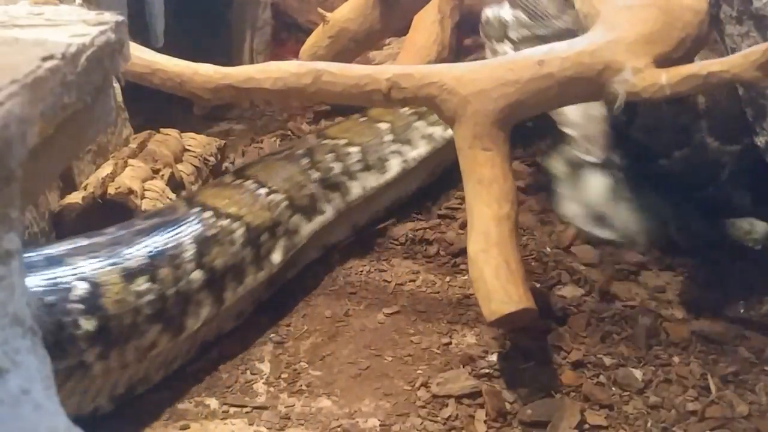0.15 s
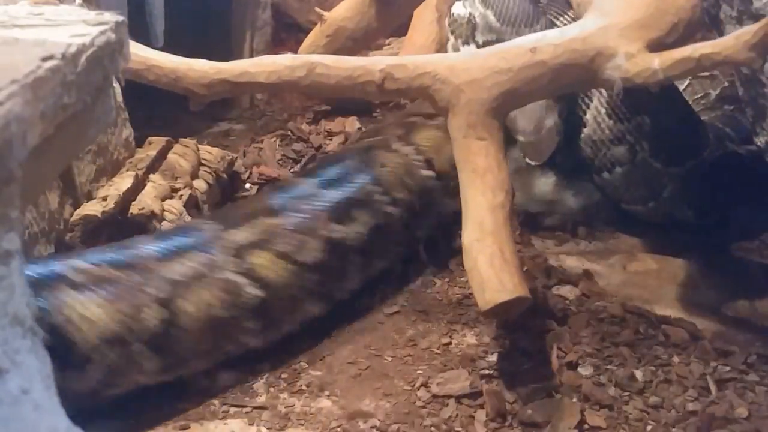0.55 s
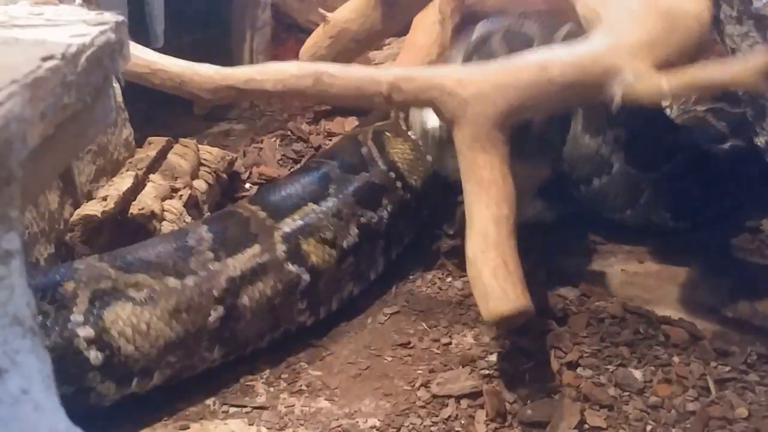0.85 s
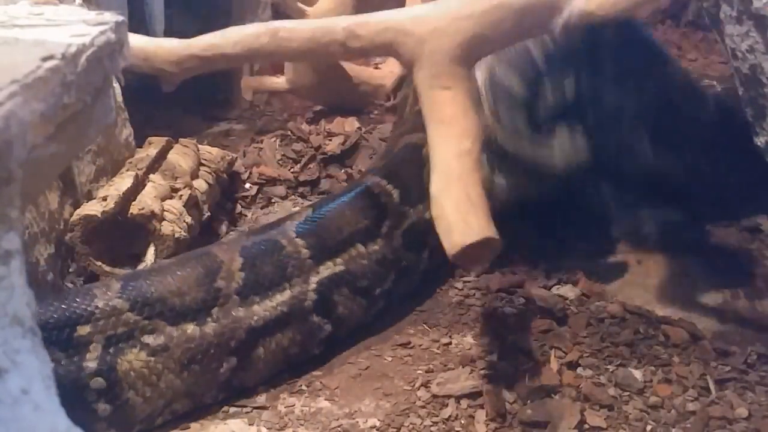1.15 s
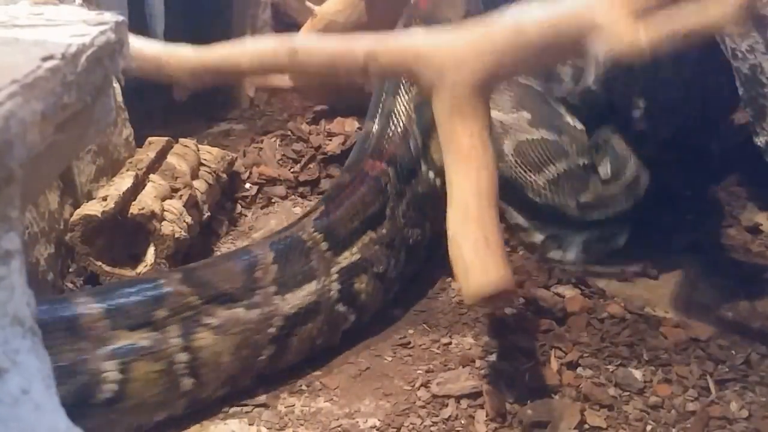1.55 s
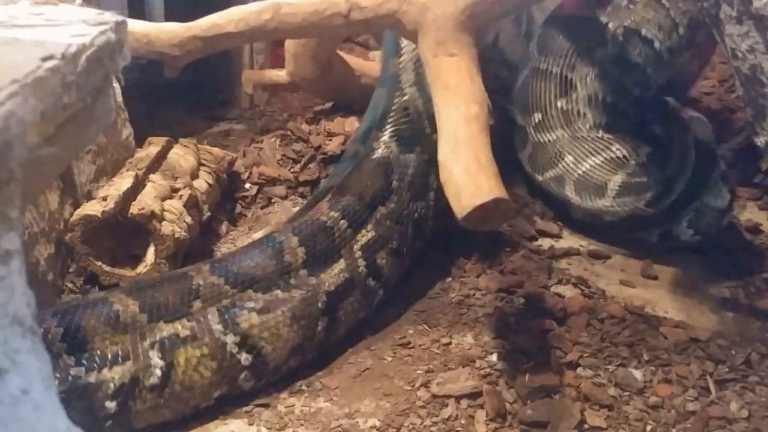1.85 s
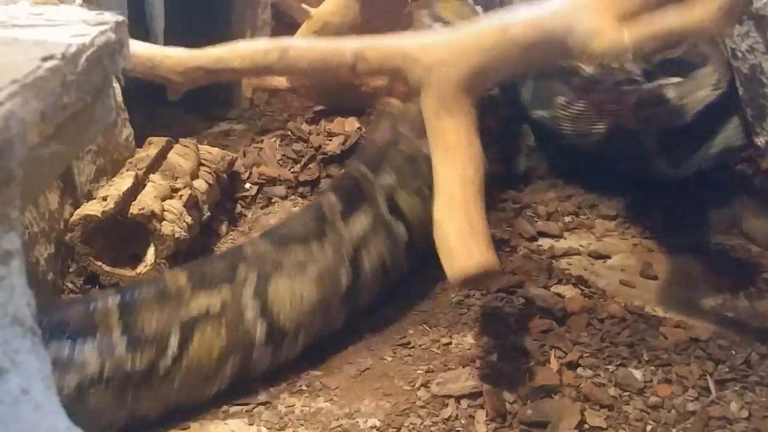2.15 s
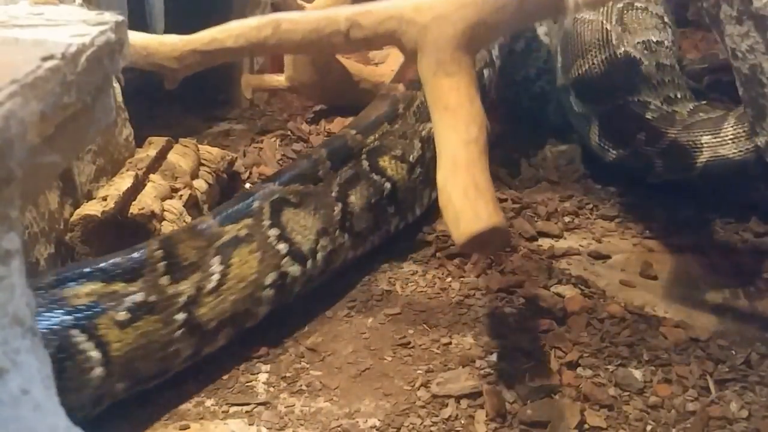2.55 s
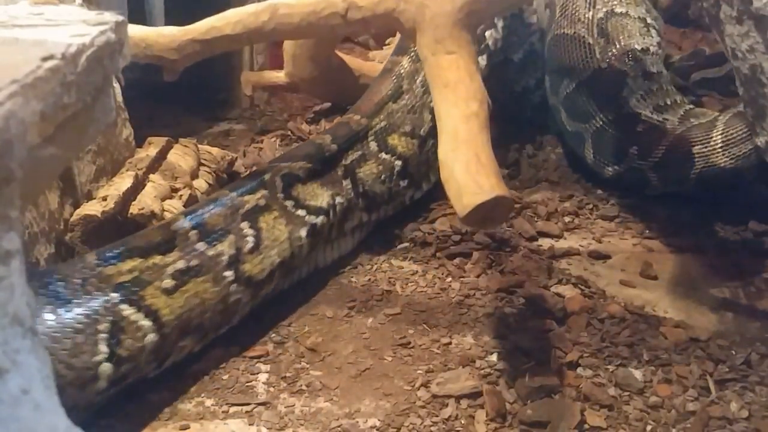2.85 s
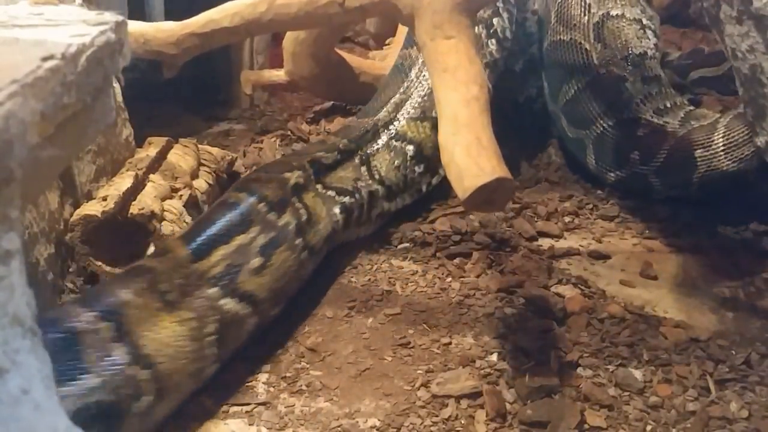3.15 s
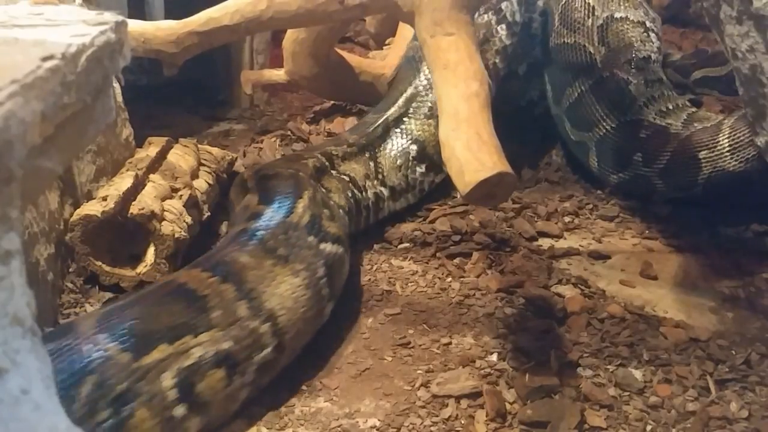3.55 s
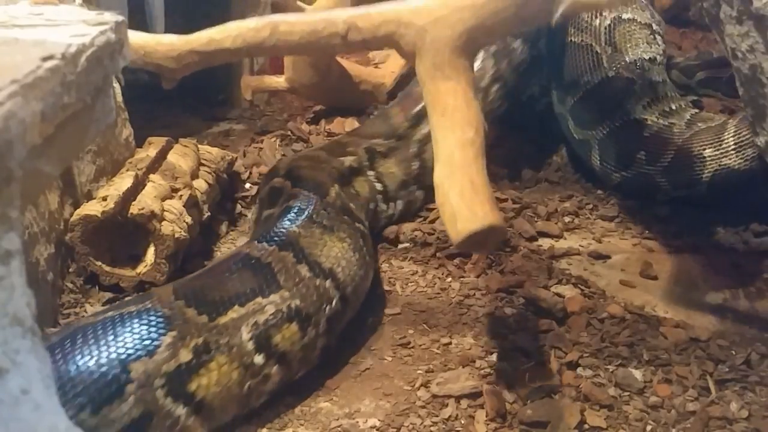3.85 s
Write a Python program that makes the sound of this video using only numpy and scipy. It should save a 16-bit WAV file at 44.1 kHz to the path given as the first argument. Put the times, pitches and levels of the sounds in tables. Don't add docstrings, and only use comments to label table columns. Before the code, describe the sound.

A rabbit squeals shrilly again and again while a heavy body bumps and rustles bark chips.

```python
import sys
import numpy as np
from scipy import signal
from scipy.fft import rfft, irfft
from scipy.io import wavfile
from scipy.ndimage import uniform_filter1d, minimum_filter1d

SR = 44100
rng = np.random.default_rng(int(sys.argv[2]) if len(sys.argv) > 2 else 0)


def boost_factor(decibels):
    exponent = np.asarray(decibels, float) / 20
    return 10 ** exponent


def generate_wav(signal):
    frames = np.transpose(np.atleast_2d(signal))
    scaled = np.clip(frames, -1, 1) * 32767
    pcm = np.round(scaled).astype(np.int16)
    wavfile.write(sys.argv[1], SR, pcm)


N = 176400

# time in seconds, level in dB.
PRESS_DB = [(0, -24.5), (.12, -36.5), (1.04, -37.5), (1.08, -15), (1.3, -15.5), (1.43, -20), (1.49, -18),
            (1.7, -40.5), (1.94, -36), (2.02, -18.5), (2.15, -32.5), (2.6, -35), (2.8, -42), (2.95, -35),
            (3.4, -43.5), (4, -36.5)]
# frequency in Hz, level in dB, T60 in seconds.
WALL_MODES = [(50.4, -3, 0.95), (64, -7, 0.92), (105.4, 2.5, 0.046), (130.6, -1, 0.69), (203.4, -3, 0.067),
              (243, -3.5, 0.085)]
BUMP_S = [1.062, 1.12, 1.468, 2.003, .005, 1.335, 2.29, 2.42, 2.87]
# level in dB, panel frequency in Hz.
BUMPS = [
    (-0.5, 75.5),
    (-5.5, 100.6),
    (-8, 110),
    (-19, 71.3),
    (-22, 80.4),
    (-13, 47),
    (-19, 54),
    (-13.5, 49),
    (-25.5, 75),
]
# time in seconds, level in dB.
STRUGGLE_DB = [(0, -36), (.35, -37), (.54, -33.5), (.57, -23.5), (.72, -39.5), (1.0, -49), (1.06, -33),
               (1.25, -26.5), (1.41, -24), (1.48, -20.5), (1.6, -48), (1.9, -44), (2.02, -26),
               (2.15, -38.5), (3.4, -53), (4, -44.5)]
# frequency in Hz, level in dB.
CHIP_SPECTRUM = [(120, -22), (200, -7), (1280, -5), (1380, -7), (7090, -21.5), (8500, -21), (10400, -15.5),
                 (12700, -28), (15500, -17.5)]
# start in seconds, length in seconds, centre in Hz, level in
# dB.
SCRAPES = [
    (.418, 0.12, 934, -25.5),
    (.56, 0.033, 820, -23),
    (1.047, 0.036, 376, -27),
    (1.13, 0.041, 830, -34),
    (1.449, 0.11, 650, -20.5),
    (1.46, 0.042, 258, -19.5),
    (2.0, 0.052, 211, -24.5),
]
# time in seconds, peak in dB.
CRACKS = [(.372, -26), (.553, 0), (.562, -7), (.694, -12), (1.044, -16), (1.46, -11), (1.47, -13),
          (.396, -20), (.615, -18), (1.821, -14), (2.022, -12), (2.983, -26)]
# frequency in Hz, level in dB, T60 in seconds.
CRACK_MODES = [(303, -6, 0.032), (1100, 3, 0.063), (1950, 18, 0.011), (2600, 19, 0.018), (4500, 11, 0.0065),
               (8140, 14, 0.0057)]
# time in seconds, level in dB, pitch in Hz.
CRY_END = [(0, -11.5, 1690), (.025, -8.5, 1621), (.055, -5.5, 1639), (.066, -45, 1740)]
CRY_A = [(0.073, -5.5, 1745), (0.099, -12, 1900), (0.127, -8.5, 1924), (.2, -8.5, 1787), (.24, -7, 1572),
         (.32, -35, 1645)]
CRY_B = [(0.416, -34, 1492), (0.432, -10, 1503), (0.453, -15, 1477), (0.519, -31, 1518)]
CRY_C = [(.76, -28, 1279), (0.788, -23.5, 1506), (0.816, -22, 1678), (0.863, -22.5, 1663)]
CRY_D = [(0.889, -38.5, 1345), (0.948, -23.5, 1210), (1.028, -27.5, 1277), (1.091, -15, 1289),
         (1.114, -6, 1433), (1.133, -16, 1474), (1.2, -61, 1370)]
CRY_E = [(1.254, -8, 1380), (1.266, -3, 1490), (1.29, -1, 1580), (1.315, -5, 1560), (1.33, -10, 1500),
         (1.37, -15, 1520), (1.4, -30, 1520)]
CRY_F = [(1.501, -24, 1360), (1.519, -8.5, 1531), (1.539, -11, 1408), (1.576, -8.5, 1643),
         (1.69, -11, 1681), (1.731, -6, 1822), (1.899, -5, 1718), (1.915, -4, 1864), (2.035, -11.5, 1806)]
CRY_G = [(2.035, -20.5, 950), (2.056, 0.5, 1536), (2.1, -7.5, 1625), (2.199, -7.5, 1715), (2.301, -7, 1765),
         (2.35, -12, 1740), (2.38, -13, 1606), (2.47, -18.5, 1693), (2.498, -61, 1675)]
CRY_H = [(2.598, -21.5, 897.6), (2.612, -16, 1212), (2.645, -2, 1689), (2.711, -4.5, 1715),
         (2.76, 2.5, 1533), (2.86, -8.5, 1537), (2.88, -9.5, 1406), (2.931, -61, 1355)]
CRY_I = [(3.011, -22, 783), (3.04, -13, 1151), (3.071, -12.5, 1430), (3.151, -8, 1436), (3.19, -3, 1440),
         (3.199, -9.5, 1376), (3.3, -8.5, 1353), (3.319, -13.5, 1280), (3.379, -55, 1251)]
CRY_J = [(3.472, -32, 842), (3.5, -16, 1100), (3.525, -10, 1346), (3.63, -6, 1401), (3.698, -7, 1371),
         (3.783, -7, 1393), (3.81, -14.5, 1227), (3.849, -19, 1214), (3.9, -52, 1217)]
HELD_ROUGH = [.12, .35, .5, .1, .12, .08, .42, .4, .13, .045, .04]
HALF_PITCH = [.02, .25, .8, .02, .02, .08, .05, .05, .2, .02, .02]
# one squeal, time in seconds.
BREAK_S = [.08, .215, .5, .87, 1.135, 1.335, 2.04, 2.365, 2.865, 3.3, 3.79]
# overtones in dB, loss per further overtone in dB.
MOUTH = [(-4, 1), (-15, 0.5), (-18, 0.5), (-27.5, 17), (-10, 9), (2, 3.5), (-4.5, -0.5), (-4, 0.0),
         (-7.5, 0.6), (-7, 0.46), (-6.5, 0.17)]
# frequency in Hz, level in dB.
THROAT = [(600, -31.5), (1500, -2), (2600, -7), (3600, -12.5), (5500, -6), (7000, -25.5), (8600, -15),
          (12600, -24.5)]
# frequency in Hz, level in dB.
AIR = [(700, -26), (1600, -0.5), (2500, -1), (3500, -0.5), (5000, -6.5), (6500, -5.5), (9000, -11),
       (14000, -19.5)]
# start in seconds, length in seconds, beats per second, depth 0-1.
BEATS = [
    (.01, .04, 110, .7),
    (.07, .24, 95, .8),
    (2.69, .07, 65, .7),
    (2.82, .09, 55, .5),
    (3.18, .14, 62, .8),
    (3.6, .1, 40, .4),
    (1.78, .14, 45, .5),
]
# start in seconds, length in seconds, pitch in Hz, level in dB.
WHISTLES = [
    (1.695, .05, 2120, -8),
    (2.365, .11, 2075, -8),
]
# start in seconds, length in seconds, centre in Hz, level in dB.
RASPS = [(.16, .14, 2500, -24), (.46, .05, 2200, -30), (1.125, .05, 2300, -21), (1.254, .025, 2600, -12),
         (1.315, .05, 2600, -14), (1.254, .11, 7000, -19), (1.51, .03, 2100, -19), (1.6, .09, 2150, -18),
         (1.635, .025, 3000, -22), (1.94, .1, 1300, -22), (2.18, .03, 2300, -20), (2.37, .1, 2600, -20),
         (2.607, .03, 2500, -21), (3.035, .04, 2200, -17), (3.49, .05, 2200, -18), (3.8, .05, 2450, -19)]
# frequency in Hz, left minus right in dB.
PORTS = [(60, 3), (250, 0.5), (1800, -2.16), (4200, -3.5), (7000, -6.5), (9500, -19), (11500, 4.5),
         (15000, 5.5)]

BUMP_T60_S = 0.35
CHIPS_PER_S, CHIPS_DB, SLIDE_DB = 500, 13.5, 4
RASP_WIDTH, SCRAPE_WIDTH, GRAIN_DB = 0.27, 0.74, 4.5
ONSET_ROUGH_S, BROKEN_ROUGH, EDGE_S = 0.035, 0.5, 0.006
JITTER, JITTER_HZ, WAVER, SLIP_GROWTH = 0.036, 200, 0.006, 1.9
SHIMMER_DB, FLICKER_DB, BREATH_DB = 4.5, 7, -0.5
SCOOP_DB, VEIL_DB = 7, 22
LEAK = 0.043
BOX_T60_S, BOX_CUT_HZ, CRACK_BOX_DB = 0.27, 13200, -9
NOTCH_HZ, NOTCH_WIDTH_HZ, NOTCH_DB = 10520, 1030, -19.5
DIP_HZ, DIP_WIDTH_HZ, DIP_DB = 3550, 300, -7
PORT_LAG_S, HISS_DB, CEILING, RELEASE_DB_PER_S = 0.00016, -74, 1, 169
LOW_CUT_HZ, CUTOFF_HZ = 40, 16100


def in_time(rows):
    s, *columns = np.transpose(rows)
    return [np.interp(np.arange(N) / SR, s, c) for c in columns]


def at_hz(points, hz):
    p = np.array(points)
    return np.interp(np.log(np.maximum(hz, 1)), np.log(p[:, 0]), p[:, 1])


def rms_one(x):
    return x / np.sqrt(np.mean(x ** 2) + 1e-20)


def drift(rate_hz):
    r = np.exp(-2 * np.pi * rate_hz / SR)
    noise = rng.standard_normal(N + SR)
    return rms_one(signal.lfilter([1], [1, -2 * r, r * r], noise)[SR:])


def colour(x, gain_db):
    return irfft(rfft(x) * boost_factor(gain_db(np.arange(N // 2 + 1) * SR / N)), N)


def ring(x, hz, t60_s):
    r, w = boost_factor(-60 / (t60_s * SR)), 2 * np.pi * hz / SR
    return signal.lfilter([0, np.sin(w)], [1, -2 * r * np.cos(w), r * r], x + 1e-18)


def gate(start_s, end_s):
    t = np.arange(N) / SR
    return np.clip(np.minimum(t - start_s + EDGE_S, end_s - t + EDGE_S) / EDGE_S, 0, 1)


def bursts(rows, width):
    out, t = np.zeros(N), np.arange(N) / SR
    noise = rng.standard_normal(N) * boost_factor(GRAIN_DB * drift(115))
    w = 1 + np.clip(width, 0.05, 2) / 2
    for s, length_s, hz, db in rows:
        a, b = int(s * SR), int((s + 1.5 * length_s) * SR)
        sos = signal.butter(2, [hz / w, hz * w], "band", fs=SR, output="sos")
        band = rms_one(signal.sosfilt(sos, noise[a:b]))
        out[a:b] += boost_factor(db) * band * np.exp(-((t[a:b] - s) / length_s) ** 4)
    return out


def hiss():
    return boost_factor(HISS_DB) * rng.standard_normal((2, N))


def box(x):
    t = np.arange(SR // 2) / SR
    tail = rng.standard_normal((2, len(t))) * boost_factor(-60 * t / BOX_T60_S) * np.minimum(t / 0.0011, 1)
    tail = signal.lfilter(*signal.butter(1, BOX_CUT_HZ, fs=SR), tail)
    tail = tail / np.sqrt(np.sum(tail ** 2, axis=1, keepdims=True))
    return signal.fftconvolve(x[None], tail, axes=1)[:, :N]


def walls():
    press_db, = in_time(PRESS_DB)
    push = rng.standard_normal((len(WALL_MODES), N)) * boost_factor(0.99 * drift(32))
    hum = np.zeros(N)
    for p, (hz, db, t60_s) in zip(push, WALL_MODES):
        hum += boost_factor(db) * rms_one(ring(p, hz, t60_s))
    out = boost_factor(press_db) * rms_one(hum)
    for s, (db, hz) in zip(BUMP_S, BUMPS):
        hit = np.zeros(N)
        hit[int(s * SR):int(s * SR) + 200] = boost_factor(db) * np.hanning(200) / 100
        out += ring(hit, hz, BUMP_T60_S)
    return out


def chips():
    struggle_db, = in_time(STRUGGLE_DB)
    sizes = boost_factor(3.5 * np.minimum(rng.exponential(1, N), 5)) * rng.choice([-1, 1], N)
    grains = rms_one(sizes * (rng.random(N) < CHIPS_PER_S * boost_factor(5 * drift(8)) / SR))
    slide = boost_factor(SLIDE_DB + 5.4 * drift(14)) * rng.standard_normal(N)
    mix = boost_factor(CHIPS_DB) * grains + slide
    rustle = colour(mix, lambda hz: at_hz(CHIP_SPECTRUM, hz) + 7 - 20 * (hz < 150))
    return boost_factor(struggle_db) * rustle + bursts(SCRAPES, SCRAPE_WIDTH)


def cracks():
    out = np.zeros(N)
    spread_db = rng.normal(0, 1.5, (len(CRACKS), len(CRACK_MODES)))
    for k, (hz, mode_db, t60_s) in enumerate(CRACK_MODES):
        hits = np.zeros(N)
        for (s, hit_db), v in zip(CRACKS, spread_db):
            hits[int(s * SR)] = boost_factor(hit_db + mode_db - 18.5 + v[k])
        out += ring(hits, hz, t60_s)
    return out


def beating(x, shimmer):
    for s, length_s, rate_hz, depth in BEATS:
        phase = np.pi * rate_hz * np.cumsum(1 + 0.25 * shimmer) / SR
        x = x * (1 - depth * gate(s, s + length_s) * np.cos(phase) ** 2)
    return x


def whistles(wobble, shimmer):
    out = np.zeros(N)
    for s, length_s, hz, db in WHISTLES:
        phase = 2 * np.pi * np.cumsum(hz * (1 + 0.01125 * wobble)) / SR
        out += boost_factor(db + SHIMMER_DB * shimmer) * gate(s, s + length_s) * np.sin(phase)
    return out


def squeals():
    out, t = np.zeros(N), np.arange(N) / SR
    wobble, waver = drift(JITTER_HZ), WAVER * drift(22.8)
    shimmer = [0.71 * drift(22) + 0.59 * drift(132) for k in range(4)]
    flicker = [drift(20) for k in range(12)]
    air = rms_one(colour(rng.standard_normal(N), lambda hz: at_hz(AIR, hz))) * boost_factor(2.5 * drift(20))
    cries = [CRY_END, CRY_A, CRY_B, CRY_C, CRY_D, CRY_E, CRY_F, CRY_G, CRY_H, CRY_I, CRY_J]
    for cry, held, crack_s, half, (open_db, loss_db) in zip(cries, HELD_ROUGH, BREAK_S, HALF_PITCH, MOUTH):
        start_s, end_s = cry[0][0], cry[-1][0]
        a, b = max(int((start_s - 0.05) * SR), 0), int((end_s + 0.05) * SR)
        db, hz = [c[a:b] for c in in_time(cry)]
        onset = np.exp(-(np.maximum(t[a:b] - start_s, 0) / ONSET_ROUGH_S) ** 2) * (cry is not CRY_END)
        broken = BROKEN_ROUGH * np.clip((t[a:b] - crack_s) / 0.02, 0, 1)
        rough = np.clip(held + 0.6 * onset + broken, 0, 1)
        phase = 2 * np.pi * np.cumsum(hz * (1 + waver[a:b])) / SR
        slip = 2 * np.pi * np.cumsum(hz * JITTER * rough * wobble[a:b]) / SR
        tone, power = 0, 0
        for k in np.arange(1, 23) / 2:
            line_db = at_hz(THROAT, k * hz) + (open_db - loss_db * (k - 3)) * (k > 1)
            line_db = line_db + SCOOP_DB * onset * (k == 2) * (cry is not CRY_B)
            line_db = line_db - VEIL_DB * rough * (k > 2)
            g = boost_factor(line_db) * (half if k % 1 else 1) * (k * hz < CUTOFF_HZ)
            power = power + g ** 2 / 2
            sway_db = SHIMMER_DB * (0.67 + rough) * shimmer[int(k) % 4][a:b]
            sway_db = sway_db + FLICKER_DB * np.sqrt(rough) * (k > 1) * flicker[int(k)][a:b]
            tone = tone + g * boost_factor(sway_db) * np.sin(k * phase + k ** SLIP_GROWTH * slip + k * k)
        puff = air[a:b] * (1 + 0.35 * np.sin(phase)) * (rough + LEAK) * boost_factor(BREATH_DB + open_db / 2)
        out[a:b] += boost_factor(db) * gate(start_s, end_s)[a:b] * (tone / np.sqrt(power) + puff)
    voice = beating(out, shimmer[0]) + whistles(wobble, shimmer[3])
    return voice + bursts(RASPS, RASP_WIDTH)


def scene():
    inside = squeals() + chips()
    snaps = cracks()
    direct = inside + snaps
    late = np.interp(np.arange(N) - PORT_LAG_S * SR, np.arange(N), direct)
    return np.array([late, direct]) + box(inside + boost_factor(CRACK_BOX_DB) * snaps) + walls() + hiss()


def ports(x):
    def notches_db(hz):
        notch = NOTCH_DB * np.exp(-((hz - NOTCH_HZ) / NOTCH_WIDTH_HZ) ** 2)
        return notch + DIP_DB * np.exp(-((hz - DIP_HZ) / DIP_WIDTH_HZ) ** 2)

    left = colour(x[0], lambda hz: notches_db(hz) + at_hz(PORTS, hz) / 2)
    right = colour(x[1], lambda hz: notches_db(hz) - at_hz(PORTS, hz) / 2)
    return np.array([left, right])


def limiter(x):
    over_db = np.maximum(20 * np.log10(np.abs(x).max(axis=0) / CEILING + 1e-9), 0)
    ramp_db = RELEASE_DB_PER_S * np.arange(N) / SR
    cut_db = np.maximum.accumulate(over_db + ramp_db) - ramp_db
    cut_db = uniform_filter1d(-minimum_filter1d(-cut_db, size=89), size=45)
    return x * boost_factor(-cut_db)


def low_pass(x):
    return signal.sosfilt(signal.butter(12, 15760, fs=SR, output="sos"), x)


def record(dry):
    x = signal.sosfilt(signal.butter(3, LOW_CUT_HZ, "high", fs=SR, output="sos"), ports(dry))
    x = signal.sosfilt(signal.cheby2(12, 70, CUTOFF_HZ, fs=SR, output="sos"), limiter(x))
    return low_pass(x)


dry = scene()
out = record(dry)
generate_wav(out)
```